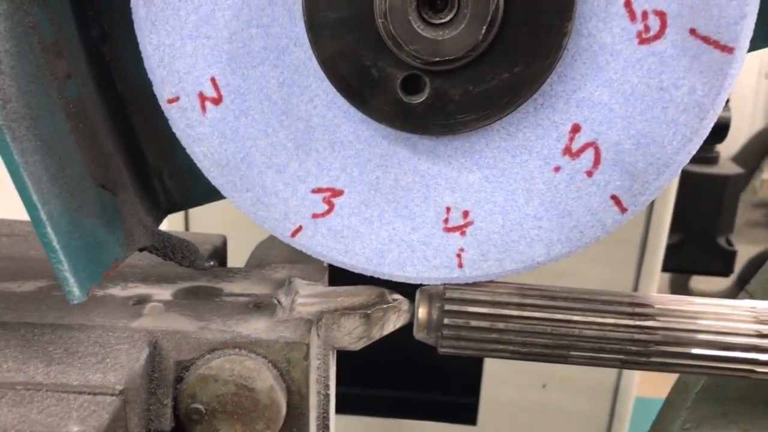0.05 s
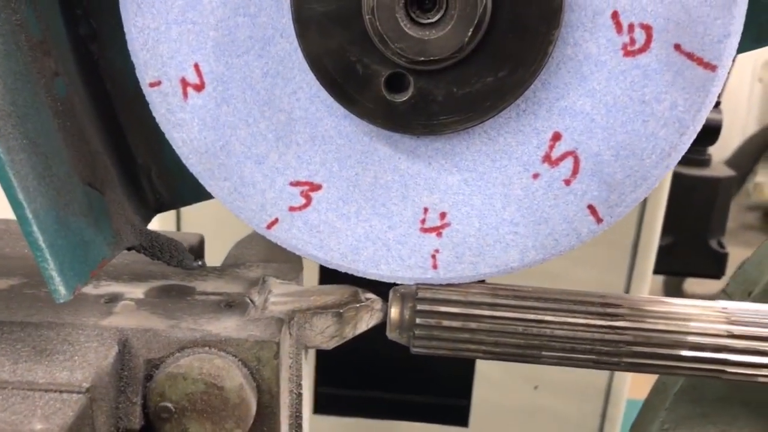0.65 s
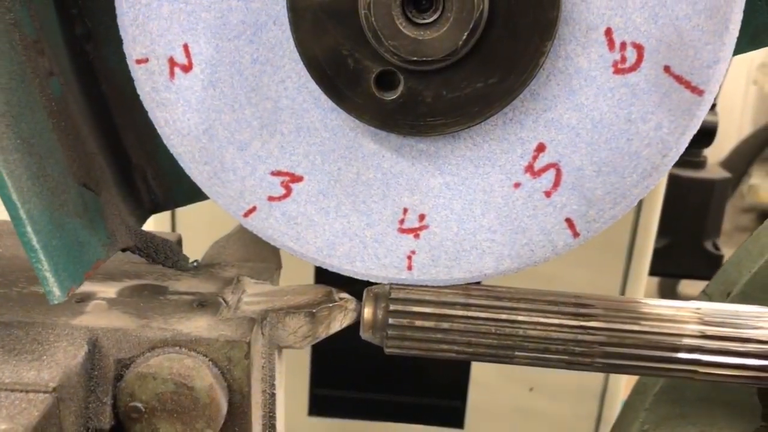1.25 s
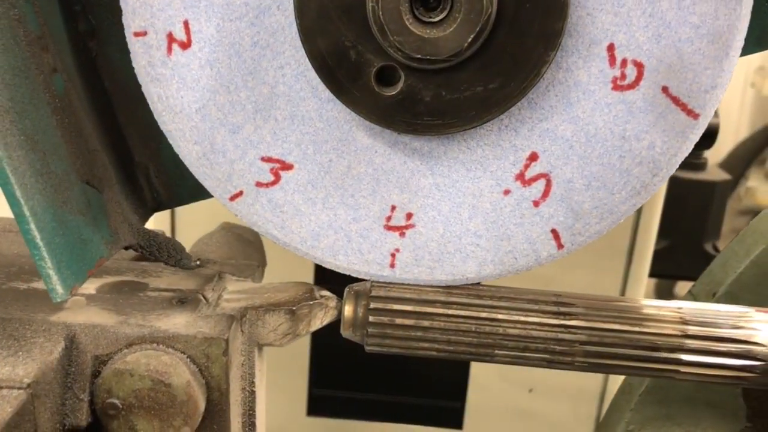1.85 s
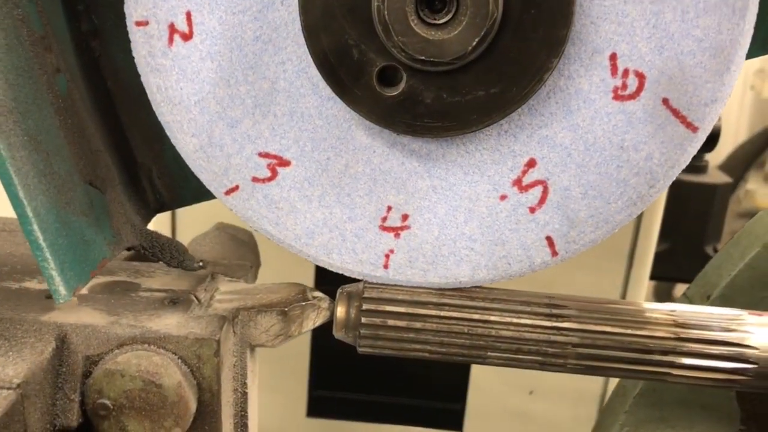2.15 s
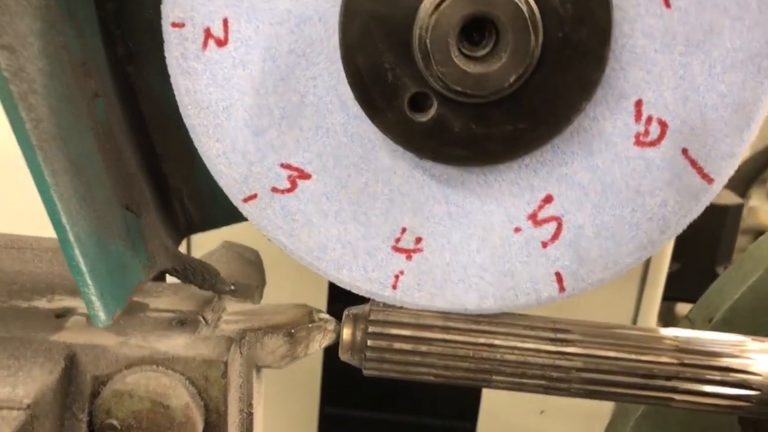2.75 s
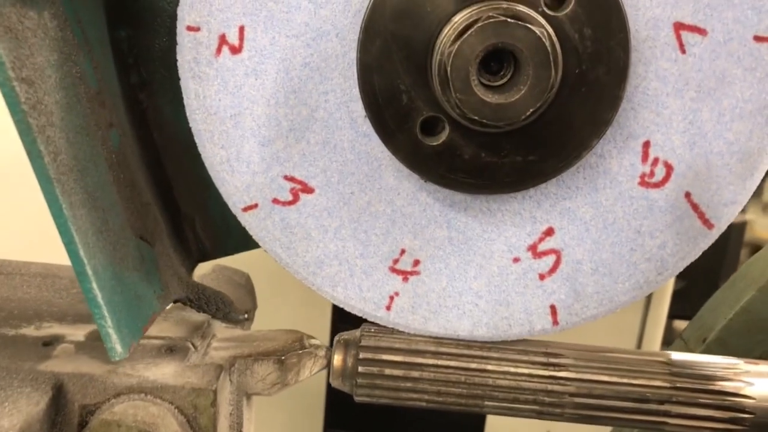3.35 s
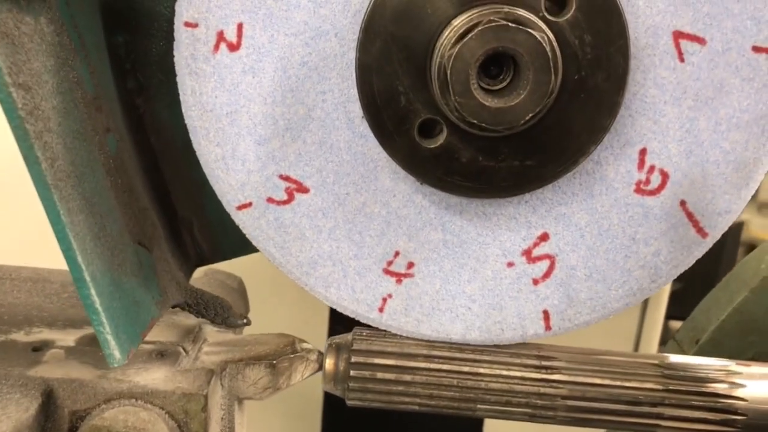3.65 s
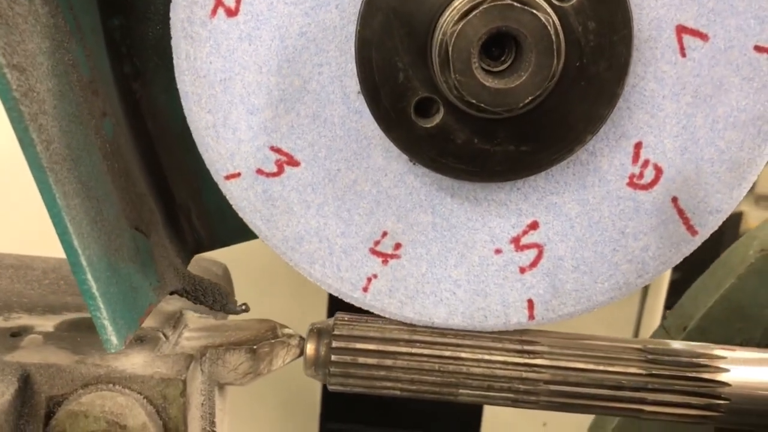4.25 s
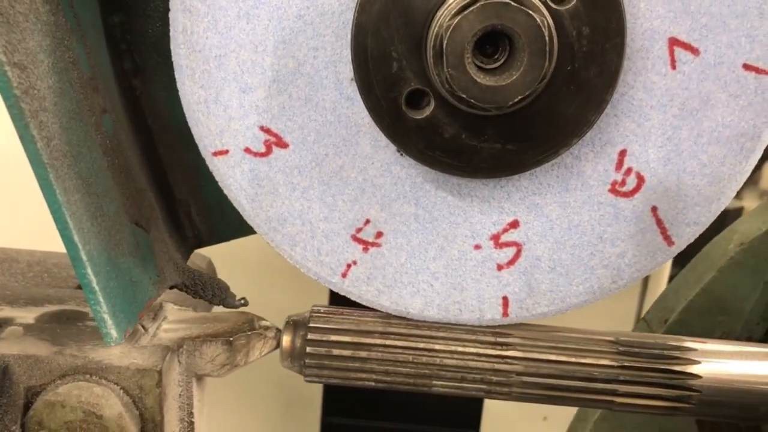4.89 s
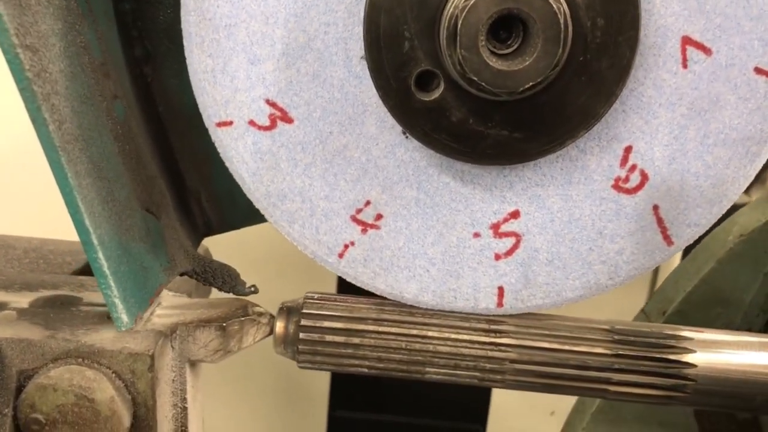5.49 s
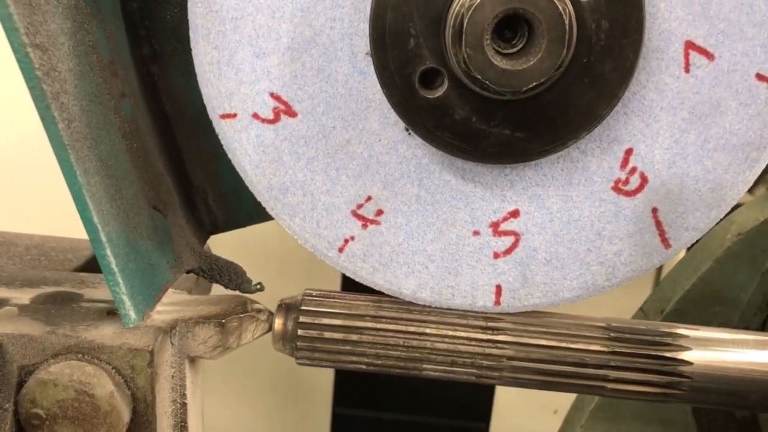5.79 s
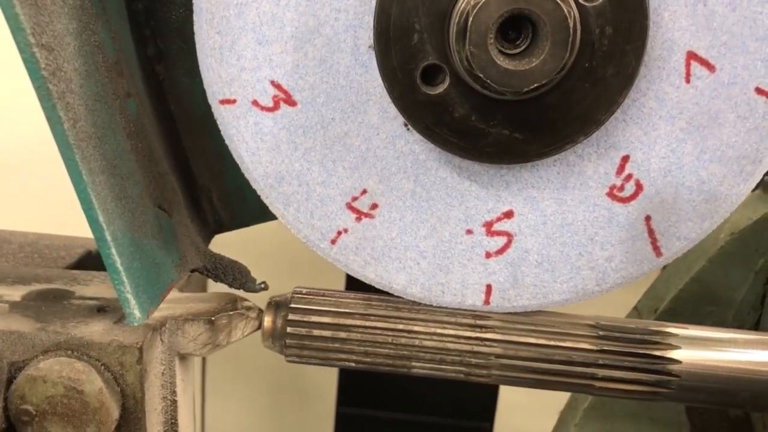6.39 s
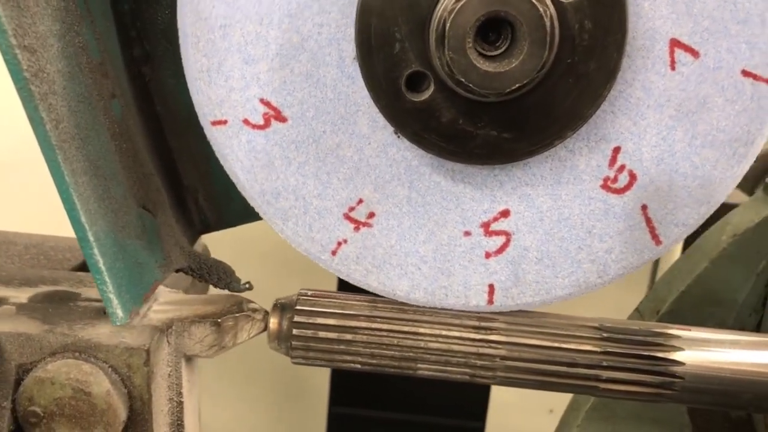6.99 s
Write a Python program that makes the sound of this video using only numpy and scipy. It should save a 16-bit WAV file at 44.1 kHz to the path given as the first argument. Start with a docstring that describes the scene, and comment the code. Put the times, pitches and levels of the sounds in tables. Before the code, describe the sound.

A grinding wheel is turned slowly against a fluted steel roll, heard close up in a small workshop with almost no echo. At first single grains break in separate sharp ticks, each with a short metallic ring. At about 0.7 seconds the machine gives a low scuff and one soft thud, and dense, gritty crackling and crunching sets in, with many louder snaps until about 3 seconds. It then eases somewhat, with one hard crack near 3.3 seconds and tiny gaps around 4 seconds. The crunching surges at 4.5 seconds, drops away, and surges again just after 5 seconds with another hard, ringing snap. Uneven crackling follows, pauses briefly near 6.6 seconds, and builds again up to the end at about 7 seconds. A faint, wavering motor hum and a steady low rush of air continue underneath.

```python
"""A small workshop, one microphone close to a fluted steel crushing roll. A stopped grinding wheel is
turned slowly against the roll. Pushed in surges, its grains break one by one and in dense crumbling
runs; every break rings the roll, the wheel and the machine frame. The roll's notes shift as the contact
moves over its flutes. Early on the machine gives one soft thud; behind it all, motor hum and air."""
import sys
import numpy as np
from scipy import signal
from scipy.fft import rfft, irfft, next_fast_len
from scipy.io import wavfile
from scipy.ndimage import uniform_filter1d

SR = 44100
rng = np.random.default_rng(int(sys.argv[2]) if len(sys.argv) > 2 else 0)


def wav_out(sig):
    """Save sig, one row per channel (or a flat mono array), as 16-bit PCM at SR to the path in sys.argv[1]."""
    wavfile.write(sys.argv[1], SR, np.round(np.clip(np.atleast_2d(sig).T, -1, 1) * 32767).astype(np.int16))


N = 314534
RING_SIZE = 4096  # every body's ring is cut off after this many samples

# grains that break loudly: (time [s], roll level [dB], knock rel. roll [dB], crumbling time [s])
GRAIN_BREAKS = [(0.0873, -42.5, -8, 0.0021), (0.1657, -40, 2.5, 0.00077), (0.1854, -30.5, -12, 0.00049),
                (0.2463, -46.5, 1.5, 0.0008), (0.3263, -39.5, -12.5, 0.0002), (0.3807, -52, 2, 0.003),
                (0.4348, -55.5, -20, 0.00033), (0.5189, -39.5, -5, .0023), (0.6948, -45.5, -2.5, 0.0012),
                (0.7593, -42.5, -4.5, 0.00044), (0.7677, -40, -11, .0003), (0.812, -38.5, -6, 0.00091),
                (0.8275, -42.5, -5, .001), (0.9712, -40.5, -9, 0.0065), (1.0381, -33, -7.5, 0.00031),
                (1.0624, -41, -2, 0.00095), (1.1273, -28, -7.5, 0.00076), (1.189, -35, -2, 0.0057),
                (1.2085, -38, -2, 0.002), (1.3531, -25.5, -0.5, 0.0024), (1.3847, -39, 2.5, .0003),
                (1.453, -29.5, -2.5, 0.00059), (1.476, -38, -5, 0.005), (1.5051, -29.5, -4.5, 0.00027),
                (1.548, -31, 2.5, 0.00073), (1.6671, -34.5, -5.5, 0.0023), (1.7849, -40, -8, 0.00059),
                (1.8329, -39.5, -1.5, 0.00044), (1.8774, -41.5, 1.5, 0.0014), (1.927, -39.5, -0.5, 0.0036),
                (1.9598, -29, -2.5, 0.00023), (1.969, -28, 2, 0.0028), (2.0993, -32.5, -6, 0.0014),
                (2.169, -37.5, -3.5, 0.00092), (2.2225, -34, .5, 0.00067), (2.3017, -34, -3.5, 0.00061),
                (2.4318, -38, -1, 0.00018), (2.4454, -28, -8, .0004), (2.525, -31, -10.5, 0.0003),
                (2.6328, -40.5, -10, 0.0011), (2.6657, -32.5, -3, .0006), (2.742, -42.5, -1, 0.00043),
                (2.8149, -37, -1, .0007), (3.0579, -36.5, -7.5, 0.0015), (3.1401, -35.5, -3.5, 0.00049),
                (3.23, -43, -9, 0.00065), (3.2924, -23.5, -15, 0.00028), (3.537, -37.5, -10, 0.00044),
                (3.7518, -45, -9.5, 0.00024), (4.2111, -34.5, -2, 0.00031), (4.4289, -41, -8, 0.01),
                (4.4497, -31, -7, 0.0026), (4.5391, -38.5, -3.5, .0015), (4.5964, -50.5, -26, 0.00076),
                (4.78, -52.5, -7, 0.00074), (4.939, -48, -11.5, 0.008), (5.1062, -37.5, -3.5, 0.00079),
                (5.1342, -32.5, -6.5, 0.0011), (5.167, -35, -8, 0.0011), (5.181, -25.5, -11.5, 0.000082),
                (5.257, -34.5, -6.5, 0.0013), (5.3696, -42, -7.5, .015), (5.4446, -44.5, -12, 0.00092),
                (5.4569, -34.5, -6, 0.0018), (5.532, -39, -3, 0.0039), (5.7206, -48, -10, .001),
                (5.7916, -45.5, -15, 0.00089), (5.8309, -42, -13, 0.00038), (5.861, -44, -10, 0.0012),
                (5.8833, -42.5, -2, 0.0028), (5.9352, -38.5, -9, .0005), (6.0192, -37, -9, 0.0011),
                (6.0347, -34, -12.5, 0.00087), (6.0899, -35.5, -14, 0.0014), (6.0991, -43, -22, 0.00083),
                (6.1322, -42, -9, 0.0025), (6.147, -35.5, -9, 0.00061), (6.406, -52, -12, 0.00078),
                (6.489, -54, -8, .002), (6.631, -46.5, -14, 0.00073), (6.8678, -40.5, -18, 0.00083),
                (6.9896, -35.5, -17, 0.0095), (7.0438, -40, 0, 0.00081)]
# how hard the wheel is pushed, in surges with brief rests: (time [s], crumbling level [dB])
SURGES = [(0, -86), (.15, -63.5), (.45, -76.5), (.66, -68), (.76, -53.5), (1.05, -52.5), (1.75, -55.5),
          (2.15, -51.5), (2.6, -53), (2.9, -59), (3.25, -57.5), (4.0, -63), (4.45, -47.5), (4.75, -70.5),
          (5.06, -65), (5.14, -45), (5.25, -54.5), (5.52, -52.5), (5.66, -66.5), (6.05, -57), (6.25, -62),
          (6.58, -66), (6.72, -55), (7.13, -48.5)]

# drift of the contact: (starting value, change over the whole travel, extra while the roll is slack)
ROLL_PITCH, ROCKING_PITCH = (1.0106, -.017, -0.024), (0.97, 0.064, -0.017)  # frequency ratios
ROLL_RING = (0.55, 0.59, .05)  # ratio of ring times
WHEEL_DB, CENTRE_DB, CRUMBLE_KNOCK_DB = (1, -8.5, 0.5), (-9, -5, 6), (-0.5, -7.5, 3)  # rel. roll
BASE_DB = (-17.5, 5.5, 11)  # rel. knock


def cracks(bodies):
    """A grain creaks under the load and snaps; its splinters are crushed at once, the debris later."""
    creak_s, creak_db, settle_s = 0.0077, -3, .012  # build-up before the snap, settling after it
    lead, size = 440, 1760
    t = (np.arange(size) - lead) / SR
    debris_shape = np.exp(-abs(t) / np.where(t < 0, creak_s, settle_s)) * undb(creak_db * (t < 0))
    out = np.zeros(N)
    for s, db, knock_db, crumble_s in GRAIN_BREAKS:
        splinters = grit(size, rate=4000, spread_db=4) * (t > 0) * np.exp(-abs(t) / (3.2 * crumble_s))
        debris = grit(size, rate=1700, spread_db=-1.5) * debris_shape
        debris_db = -9 - .5 * max(db + 42, 0)  # the hardest snaps are the cleanest
        force = (t == 0) + unit(splinters) + undb(debris_db) * unit(debris)
        strength = undb(db) * np.sqrt(SR / 100)
        # the less a grain knocks the frame, the brighter it snaps
        bright_db = 0.2744 * (-6.5 - knock_db) + 1.16 * rng.standard_normal()
        add(out, s - lead / SR, radiate(strength * unit(force), s, bodies, knock_db, bright_db))
    return out


def crumbling(bodies):
    """Small grains give way in uneven flurries, more under a harder push, and damp the roll a little."""
    push_db = effort(np.arange(N) / SR)
    grains_per_s = 1000 * undb(.5 * (push_db + 56))
    grains = grit(N, rate=grains_per_s, spread_db=4.5) * undb(2.54 * walk(130))
    power = np.maximum(uniform_filter1d(grains ** 2, SR // 20), 0)
    grains /= np.sqrt(power + 1e-6)  # evened out, so that the push sets the level
    grains *= undb(push_db - 0.43 + 1.67 * walk(35))
    force = (grains + chips()) * undb(catches())
    out, block = np.zeros(N), SR // 8
    for i in range(0, N, block):
        s = i / SR
        knock_db = drift(CRUMBLE_KNOCK_DB, s)
        add(out, s, radiate(force[i:i + block], s, bodies, knock_db, bright_db=0.73, ring_ratio=0.87))
    return out


def chips(mean_gap_s=.08, above_crumbling_db=4.5, spread_db=3.5):
    """The force of small grains that snap at uneven moments, louder under a harder push."""
    wait, size = rng.random((120, 2)).T
    times = np.cumsum(mean_gap_s * 2 * wait)
    levels_db = effort(times) + above_crumbling_db + spread_db * (2 * size - 1)
    force = np.zeros(N)
    for s, db in zip(times, levels_db):
        if s < N / SR:
            add(force, s, undb([db]) * np.sqrt(SR / 100))
    return force


def catches(hold_s=0.024, dip_db=-4.5):
    """A grain holds the wheel back before it snaps: the dips of the crumbling, in dB."""
    dips = np.zeros(N)
    for s, *_ in GRAIN_BREAKS:
        add(dips, s - hold_s, np.linspace(0, dip_db, num=int(hold_s * SR)))
    return dips


def effort(s):
    """Level of the crumbling in dB at the times s: it follows the push, with a few gaps."""
    # brief gaps in the crumbling, and one longer pause near 6.6 s: (time [s], half length [s])
    gaps = [(0.619, 0.0084), (4.013, 0.014), (4.046, 0.0097), (6.581, 0.062)]
    dip = sum(np.exp(-((s - at) / half_length) ** 2) for at, half_length in gaps)
    return curve(SURGES, s) - 18 * dip


def drift(rule, s, seated_s=0.81, seating_s=0.19):
    """A property of the contact at time s: the wheel takes up the slack and travels as it is pushed."""
    times = np.linspace(0, N / SR, num=200)
    travel = np.cumsum(undb(curve(SURGES, times)))
    slack = 1 / (1 + np.exp((s - seated_s) / seating_s))
    start, turned, loose = rule
    return start + turned * np.interp(s, times, travel / travel[-1]) + loose * slack


def radiate(force, s, bodies, knock_db, bright_db, ring_ratio=1):
    """A force at the contact rings all the bodies; knock lifts the low ones, bright the high ones."""
    # modes of the roll: (frequency [Hz], energy [dB], t60 [s])
    roll_notes = [(3323.3, -0.5, 0.043), (3382, -6, 0.0095), (3420, -21, 0.0057)]
    bending_pair = [(4740, 4.5, 0.024), (4890, -2.5, 0.018)]
    overtones = [(12030, 7, 0.018), (12120, 6, 0.0097), (14900, -7, 0.018), (15420, -12, 0.0083)]
    rocking = [(1059, 3.5, 0.032), (1154, 3.5, 0.034), (1326, -6.5, 0.052)]  # between its centres
    # strength of the roll's overtones: (time [s], level [dB])
    overtone_levels = [(0, -22), (.6, -17), (.8, -7), (2.7, -8), (3.3, -3), (4.3, -6), (5.2, -5.5),
                       (6.1, -1.5), (6.7, 0.5), (7.13, -16)]
    # rasp of the porous wheel's countless short, overlapping modes: (frequency [Hz], level [dB])
    rasp_spectrum = [(300, -21.5), (900, -63), (1700, 9.5), (2550, -4.5), (3800, -18), (4500, 8.5),
                     (6000, -5.5), (8500, 6.5), (11000, -2), (13000, 2.5), (16000, 4.5)]
    frame, base, wheel, spindle, centre = bodies
    # the roll jumps clear for a moment: it rings longer, and wheel and centre are quieter
    clear = np.exp(-((s - 5.181) / 0.0094) ** 2)
    hold = drift(ROLL_RING, s) * ring_ratio * (1 + 1.2 * clear)
    wheel_db = drift(WHEEL_DB, s) + bright_db - 11 * clear
    centre_db = drift(CENTRE_DB, s) - 11 * clear
    overtones_db = curve(overtone_levels, s) + bright_db - .5
    bending_db = -10 + 20 * np.log10(hold)  # a loosely held roll bends more
    pitch = drift(ROLL_PITCH, s) * (1 + 0.003 * rng.standard_normal())  # each grain grips differently
    rasp = unit(coloured(rasp_spectrum, RING_SIZE) * fade(0.01, RING_SIZE))
    size = next_fast_len(len(force) + RING_SIZE, True)
    highs = rfft(high_pass(force, hz=1800), size)  # small parts radiate no bass
    mids = rfft(high_pass(force, hz=610), size)
    paths = [(highs, ring(roll_notes, pitch, hold), 0),
             (highs, ring(bending_pair, pitch, hold), bending_db),
             (highs, ring(overtones, pitch, hold), overtones_db),
             (highs, wheel + undb(2.9) * rasp, wheel_db),
             (highs, spindle, -10.875 + 0.25 * wheel_db),
             (highs, centre, centre_db),
             (mids, ring(rocking, drift(ROCKING_PITCH, s)), knock_db - .3),
             (mids, frame, knock_db - 11.5),
             (rfft(force, size), base, knock_db + drift(BASE_DB, s))]
    spectrum = sum(undb(db) * unit(drive * rfft(response, size)) for drive, response, db in paths)
    return irfft(spectrum, size) * np.sqrt(np.sum(force ** 2) * size / 2)


def machine_bodies():
    """The rings of the parts around the roll, whose notes stay put as the wheel turns."""
    # modes of each part: (frequency [Hz], energy [dB], t60 [s])
    frame = [(765, 0, .13), (1895, -1, .07)]
    base = [(152, -9.5, 0.15), (181, -1, 0.032), (248, -0.5, 0.13), (267.3, -1.5, 0.83),
            (306.4, -3.5, 0.16), (378, -3, 0.26), (426, -7.5, 0.18), (630, -11, 0.024)]
    wheel = [(5270, -5, 0.012), (6464, -1, 0.0046), (6920, 1.5, 0.0065), (7100, -24, 0.013),
             (7460, -2.5, 0.004), (7820, -16, 0.006), (8694, -3.5, 0.0067), (9430, 1.5, 0.021),
             (9595, -1.5, 0.011), (10570, -11, 0.025)]
    spindle = [(4118, 0, .075), (6170, -8, .08), (8320, -15, .04), (8568, -10, .055), (11258, -12, .07),
               (13515, -12, .035)]  # long steel notes of the wheel's flange and spindle
    centre = [(2119, 0, 0.058)]  # the steel centre that carries the roll
    return [ring(modes) for modes in (frame, base, wheel, spindle, centre)]


def ring(modes, pitch=1, hold=1):
    """A struck body: neighbouring modes swing against each other, so close ones swell, then fade."""
    t = np.arange(RING_SIZE) / SR
    out = np.zeros(RING_SIZE)
    for k, (hz, db, t60) in enumerate(modes):
        mode = fade(t60 * hold, RING_SIZE) * np.sin(2 * np.pi * hz * pitch * t)
        out += (-1) ** k * undb(db) * unit(mode)
    return unit(out)


def bump():
    """The wheel scuffs as it starts to move, and the machine gives a soft thud."""
    # low scuffs: (time [s], band centre [Hz], level [dB], length [s])
    scuffs = [(0.647, 520, -54, 0.11), (0.695, 235, -49, 0.057)]
    # the thud: (time [s], frequency [Hz], level before its decay [dB], length [s])
    thuds = [(0.713, 120, -30, 0.038)]
    out = np.zeros(N)
    for s, hz, db, length in scuffs:
        size = int(length * SR)
        noise = coloured([(hz / 3, -30), (hz / 1.3, 0), (hz * 0.96, 0), (hz * 3, -30)], size)
        add(out, s, undb(db) * np.hanning(size) * noise / noise.std())
    for s, hz, db, length in thuds:
        t = np.arange(int(length * SR)) / SR
        envelope = signal.windows.tukey(len(t), .5) * fade(0.091, len(t))
        add(out, s, undb(db) * np.sqrt(2) * envelope * np.sin(2 * np.pi * hz * t))
    return out


def room(x, t60, wet_db):
    """The close sound, followed by a faint, dull tail from the walls."""
    size = SR // 2
    tail = coloured([(200, 6), (2000, 7), (5000, -2), (15000, -3)], size) * fade(t60, size)
    tail[:SR // 150] = 0  # the gap before the first reflection
    return x + undb(wet_db) * signal.fftconvolve(x, unit(tail))[:N]


def workshop(air_db=-57):
    """Room tone: wavering motor hum over a steady rush of air."""
    # motor hum: (frequency [Hz], rms level [dB])
    hum_tones = [(48.6, -61.5), (61, -64), (119.5, -66), (267, -68.5), (764, -80.5)]
    # rush of air: (frequency [Hz], relative level [dB])
    air_spectrum = [(24, -12), (44, -2.5), (80, -0.5), (140, -3), (260, -8), (400, -13.5), (600, -19.5),
                    (1200, -24), (2600, -31), (6000, -36), (16000, -38)]
    t = np.arange(N) / SR
    hum = np.zeros(N)
    for hz, db in hum_tones:
        amplitude = np.sqrt(2) * undb(db + 2.3 * walk(1.79))
        hum += amplitude * np.sin(2 * np.pi * hz * t + 1.7 * walk(3.94))
    return hum + undb(air_db) * np.sqrt(N) * unit(coloured(air_spectrum, N))


def grit(size, rate, spread_db):
    """Sparse clicks of unequal strength, about rate of them a second."""
    hit = rng.random(size) < rate / SR
    polarity = rng.choice([-1, 1], size)
    return hit * polarity * undb(spread_db * np.minimum(rng.exponential(size=size), 4))


def walk(rate):
    """A smooth random wander with a spread of one, at rate steps a second."""
    k = int(SR / rate)
    steps = np.repeat(rng.standard_normal(N // k + 1), k)
    smooth = uniform_filter1d(uniform_filter1d(steps, k), k)[:N]
    return smooth / smooth.std()


def coloured(points, size):
    """Noise with a spectrum through (frequency [Hz], level [dB]) points."""
    hz, db = np.transpose(points)
    f = np.maximum(np.fft.rfftfreq(size, 1 / SR), 1)
    gain = undb(np.interp(np.log(f), np.log(hz), db))
    return irfft(rfft(rng.standard_normal(size)) * gain, size)


def fade(t60, size):
    """An exponential decay that loses 60 dB in t60 seconds."""
    return np.exp(-np.log(1000) * np.arange(size) / SR / t60)


def high_pass(x, hz):
    """Second-order high-pass."""
    return signal.lfilter(*signal.butter(2, hz, "high", fs=SR), x)


def undb(db):
    """Decibels to gain."""
    return 10 ** (np.asarray(db) / 20)


def unit(x):
    """Scale to an energy of one."""
    return x / np.sqrt(np.sum(np.abs(x) ** 2) + 1e-18)


def curve(table, s):
    """A (time, value) table read at the times s."""
    return np.interp(s, *np.transpose(table))


def add(out, s, x):
    """Mix x into out from the time s on."""
    i = int(np.clip(s * SR, 0, N - 1))
    out[i:i + len(x)] += x[:N - i]


def scene():
    """Cracks and crumbling close up, through the same bodies, with the workshop behind; mono."""
    bodies = machine_bodies()
    machine = cracks(bodies) + crumbling(bodies) + bump()
    return (room(machine, t60=0.092, wet_db=-19) + workshop())[None]


def record(dry):
    """The top is cut steeply above 15.8 kHz."""
    return signal.sosfilt(signal.ellip(8, .2, 70, 15800, fs=SR, output="sos"), dry)


dry = scene()
out = record(dry)
wav_out(out)
```